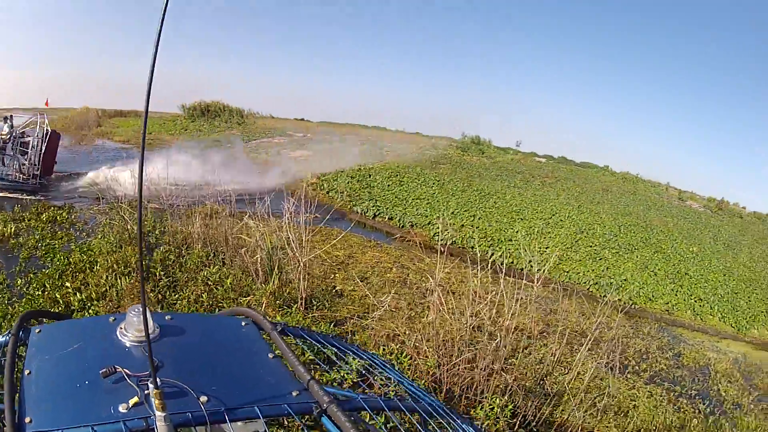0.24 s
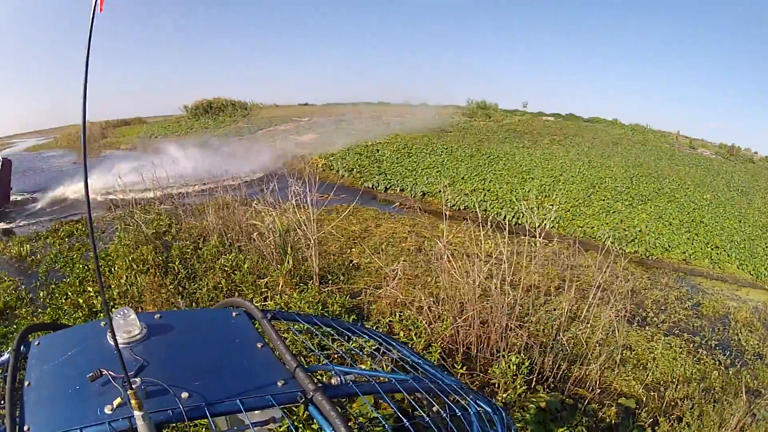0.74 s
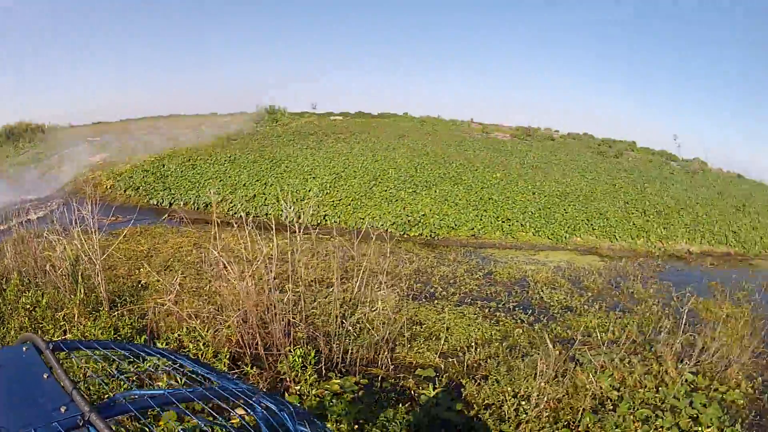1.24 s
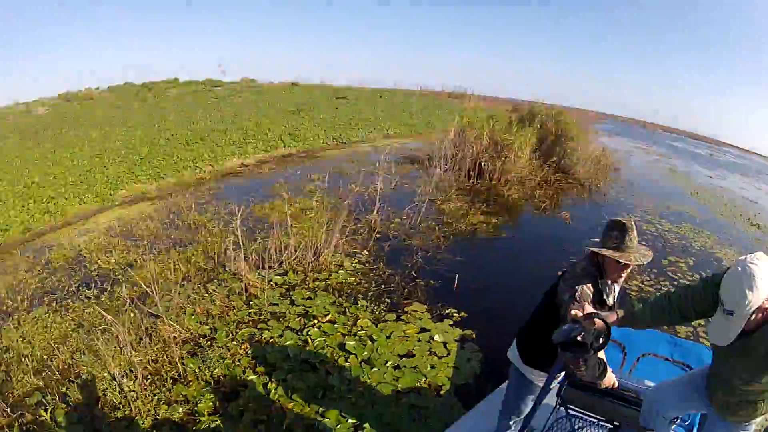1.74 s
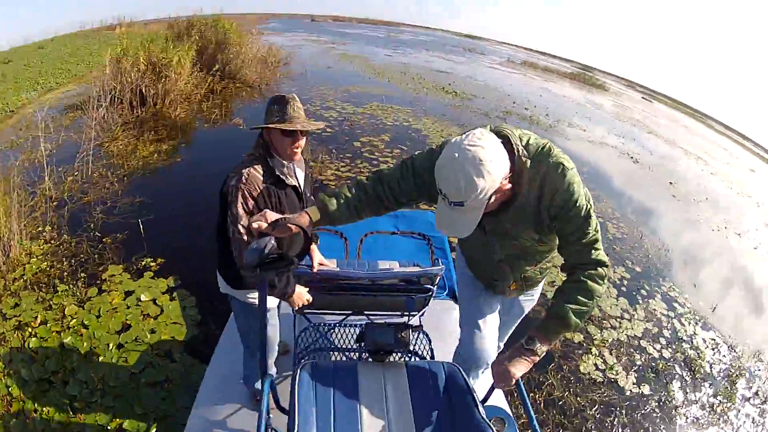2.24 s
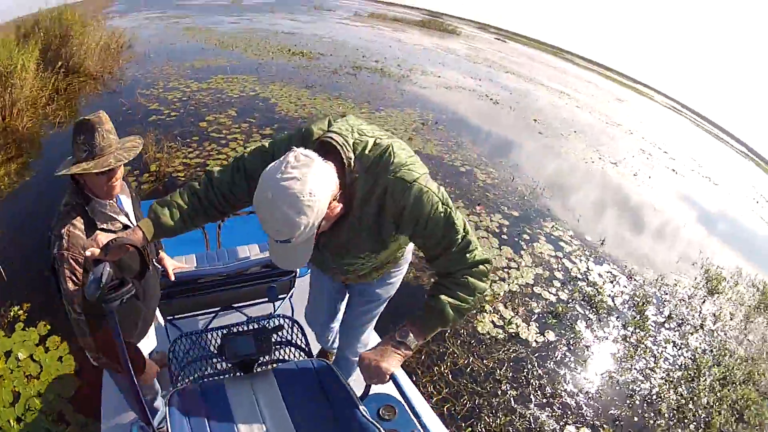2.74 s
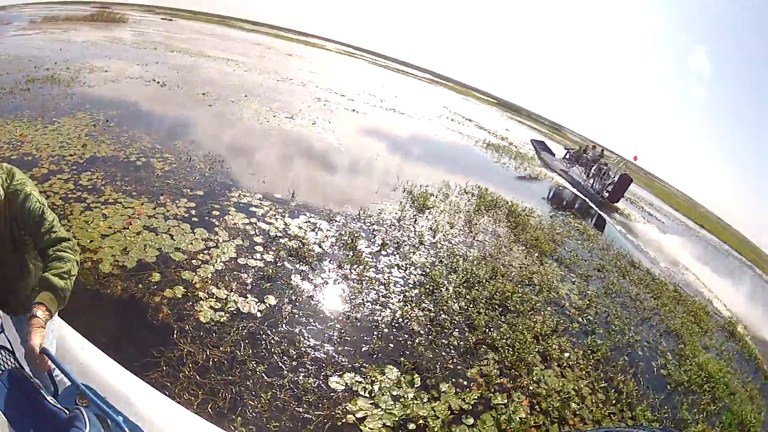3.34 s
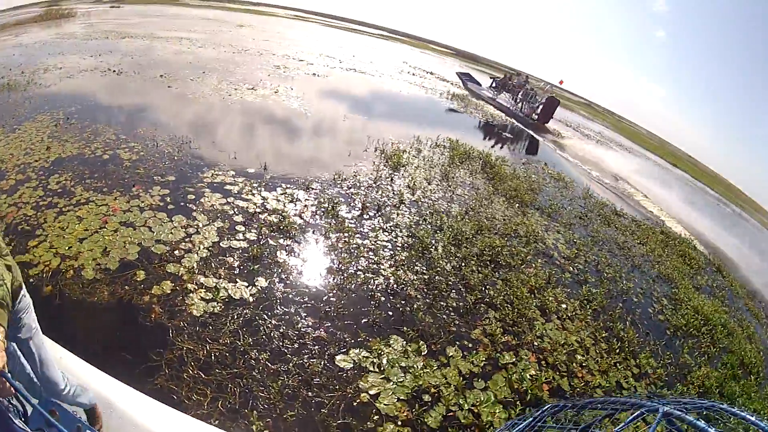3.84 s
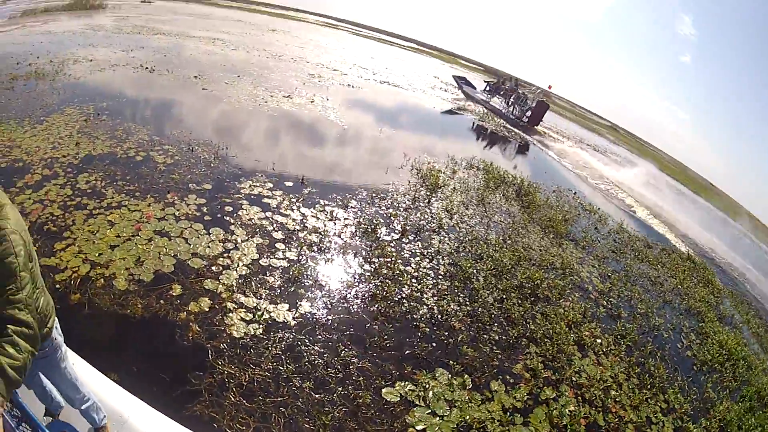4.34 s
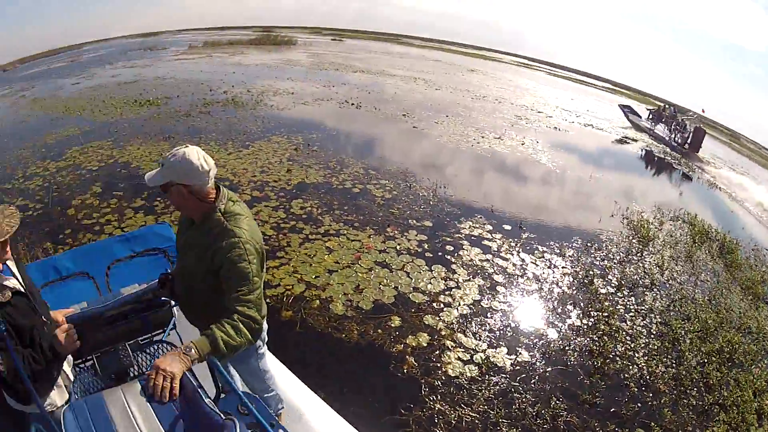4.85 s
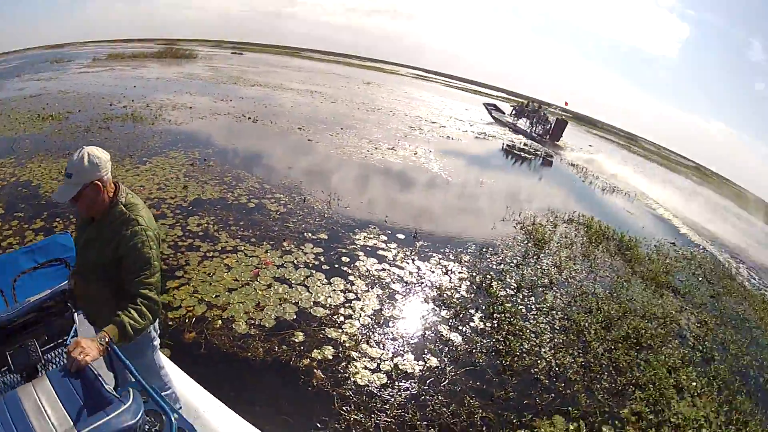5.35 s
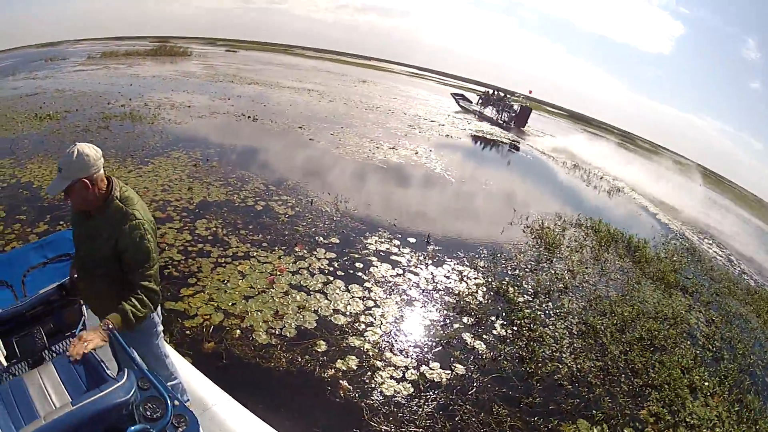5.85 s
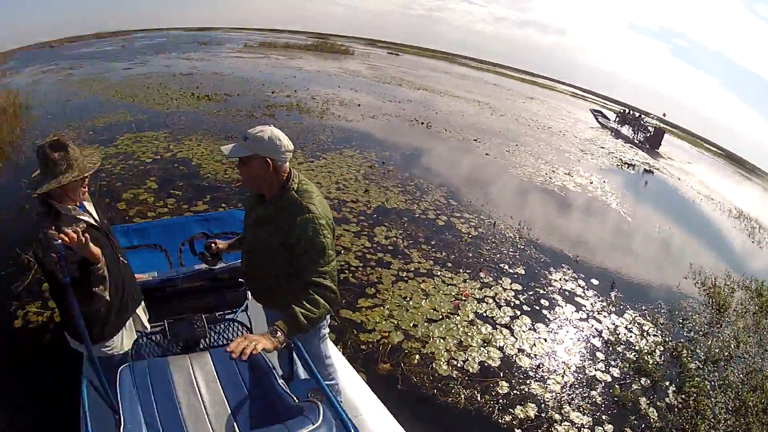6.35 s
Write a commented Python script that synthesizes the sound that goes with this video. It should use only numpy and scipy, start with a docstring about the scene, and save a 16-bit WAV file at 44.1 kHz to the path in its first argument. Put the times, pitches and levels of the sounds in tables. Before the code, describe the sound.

A circling airboat drones loudly, its chopping propeller and rough exhaust easing off and picking up again with the throttle.

```python
"""An airboat circles over a marsh, heard through the microphone of a small head-worn camera.
It starts fast, off to the left: a V8 with open pipes drives a geared three-blade propeller, which
thumps and chops the air into a rasping wash. By 1 s the throttle eases and the boat passes behind;
it opens up by 1.8 s, coming round on the right. In front from 3.2 s, it eases again, then picks up
further off by 5.5 s. Each turn of the head makes the camera's housing colour the sound anew,
and throughout its slow sampling mirrors the wash into the treble."""
import sys
import numpy as np
from scipy import signal
from scipy.fft import rfft, irfft, next_fast_len
from scipy.io import wavfile
from scipy.ndimage import uniform_filter1d

SR = 44100
rng = np.random.default_rng(int(sys.argv[2]) if len(sys.argv) > 2 else 0)


def master(y):
    """Save y as 16-bit WAV."""
    cut = np.clip(np.atleast_2d(y).T, -1, 1)
    pcm = np.round(cut * 32767)  # scale
    wavfile.write(sys.argv[1], SR, pcm.astype(np.int16))


N = 290619

# Air wash at the microphone, one spectrum per heading: (frequency [Hz], relative density [dB])
WASH_SPECTRA = [
    [(520, -27), (880, -15.5), (969, -12), (1080, -20), (1180, -14), (1350, -19.5), (1510, -13),
     (1860, -7.5), (2270, -7), (2560, 0.5), (2910, -11), (3130, -7), (4210, -18), (4950, -14.5),
     (6000, -26), (7800, -62), (13200, -120)],
    [(520, -40), (880, -18), (923, -7), (1000, -7), (1520, -4.5), (1650, -6), (1810, -5.5), (2290, -2),
     (2480, -6.5), (2840, 1.5), (3110, -12), (4080, -9.5), (4990, -16), (5490, -12), (6000, -28),
     (7800, -60), (13200, -120)],
    [(520, -27), (880, 0.5), (1050, -8.5), (1450, -2), (1760, 0), (2230, 0), (2440, -6), (2710, 6),
     (2870, -5.5), (3160, -4.5), (3450, -19), (3680, -6), (4020, -17.5), (4910, -12), (6000, -26),
     (7800, -68), (13200, -120)],
    [(520, -25), (880, -9), (993, -4), (1190, -12), (1580, -1), (1950, -1.5), (2270, 3), (2750, -6.5),
     (2870, -7.5), (2940, -19), (3710, -11), (4210, -26.5), (4680, -12), (5150, -22), (6000, -27),
     (7800, -61), (13200, -120)],
    [(520, -47), (880, -24), (993, -18.5), (1180, -26), (1440, -23), (1580, -15), (1830, -19), (2250, -14),
     (2670, 1), (3030, -11.5), (3370, -19), (4250, -25), (4490, -33), (5150, -21.5), (6000, -37),
     (7800, -71), (13200, -120)],
    [(520, -40), (880, -13), (1230, -10.5), (1630, -7.5), (1780, -12.5), (2360, -1.5), (2520, 2.5),
     (2780, -2), (3080, -9), (3310, -19), (3710, -11), (4050, -21.5), (4910, -15.5), (5410, -31),
     (6000, -32), (7800, -71), (13200, -120)],
    [(520, -48), (880, -20), (1180, -14.5), (1370, -24), (1580, -16), (1760, -19.5), (2010, -13.5),
     (2290, -12), (2520, -2), (2670, 3), (3310, -18), (4250, -23.5), (4570, -34), (5150, -18.5),
     (6000, -38.5), (7800, -71), (13200, -120)],
]
# Resonances and hollows of the housing, alike at every heading: (centre [Hz], width [Hz], gain [dB])
HOUSING_RESONANCES = [(994, 31, -4), (1397, 22, -10), (1598, 33, 4.5), (2135, 51, 3.5), (2170, 66, -1),
                      (2730, 40, -1), (3034, 140, 4), (3690, 42, 6.5), (4126, 100, 5.5), (4480, 160, -2),
                      (4730, 150, 2.5), (5530, 91, -5.5), (5650, 120, 3)]
# The wash swells and sinks as the boat curves: (time [s], level [dB])
WASH_SWELL = [(0, 1), (.15, 3), (.4, 0), (.65, 0.2), (1.05, -0.3), (1.4, 0), (1.63, -4), (1.77, -0.5),
              (2.1, -0.6), (2.4, 1.2), (2.95, 0.2), (3.13, 2.5), (3.3, -0.9), (4.1, 0.4), (4.8, -.5),
              (5.6, 0.6), (6.35, 0.9), (6.59, -3.5)]

def air_wash(blade_angle, level_db):
    """Vortices shed by the tips: a rasp that puffs once per blade over a steadier hiss of spray."""
    swell_db, = curves(WASH_SWELL)
    gain = amp(level_db + swell_db + 0.32 * wobble(8.8))
    puff_sizes = amp(1.9 * rng.standard_normal(int(blade_angle[-1] / np.pi) + 4))
    puff_angle = blade_angle - .8
    blade_index = (puff_angle / (2 * np.pi) + .5).astype(int)
    puffs = puff_sizes[blade_index] * np.exp(2.0 * (np.cos(puff_angle) - 1))
    rasp = unit((1 + 0.84 * puffs) * patchy_noise(depth_db=1.4))
    hiss = unit((1 + 0.12 * puffs) * patchy_noise(depth_db=2.0))
    rasp_share = lambda hz: np.exp(-.5 * (np.log((hz + 1) / 2500) / 0.35) ** 2)  # the middle band
    air = filtered(rasp, lambda hz: np.sqrt(rasp_share(hz)))
    air += filtered(hiss, lambda hz: np.sqrt(1 - rasp_share(hz)))
    cavity = lambda hz: amp(sum(db * peak(hz, centre, width) for centre, width, db in HOUSING_RESONANCES))
    per_heading = filtered(air, lambda hz: cavity(hz) * np.array([gain_at(s, hz) for s in WASH_SPECTRA]))
    return gain * at_heading(unit(per_heading))


# Partials of the thump: (multiple of the blade rate, level when slow [dB], level when fast [dB])
BLADE_PARTIALS = [(1, 0.0, 0.0), (2, -3.0, -2.0), (3, -15.4, -12.1), (4, -13.9, -12.0), (5, -15.7, -17.0),
                  (6, -16.2, -17.0), (7, -15.5, -17.2), (8, -14.8, -14.6), (9, -13.6, -21.4),
                  (10, -19.0, -21.8), (11, -16.6, -24.6)]

def propeller(blade_angle, fast, level_db, slap_db):
    """Each passing blade gives one thump, sharper when it slaps; the upper partials waver in the air."""
    lag_rad = .7
    thumps = np.zeros(N)
    for k, slow_db, fast_db in BLADE_PARTIALS:
        partial_db = slow_db + fast * (fast_db - slow_db) + slap_db * np.log2(k)
        waver_db = .2 * (k - 1) * wobble(8)
        waver_rad = .08 * (k - 1) * wobble(7.3)
        thumps += amp(partial_db + waver_db) * np.cos(k * (blade_angle - lag_rad) + lag_rad + waver_rad)
    return amp(level_db) * np.sqrt(2) * thumps


# The open pipes favour other orders as the speed changes:
# (multiple of the four-stroke cycle rate, level when slow [dB], level when fast [dB])
EXHAUST_ORDERS = [(2, -20.0, -24.8), (3, -5.2, -2.6), (4, -13.2, -23.9), (5, -7.0, -6.0), (6, -12.9, -27.3),
                  (7, -14.4, -8.2), (8, -4.8, -6.7), (9, -21.2, -15.4), (10, -20.0, -19.0),
                  (11, -12.9, -10.0), (12, -15.5, -20.7), (13, -6.1, -23.1), (14, -25.3, -28.3),
                  (15, -18.0, -18.0), (16, -7.1, -18.2), (17, -21.3, -13.1), (18, -13.5, -12.3),
                  (19, -9.5, -13.3), (20, -18.0, -18.0), (21, -5.5, -21.0), (22, -13.5, -25.0),
                  (23, -19.1, -22.3), (24, -15.2, -20.5), (25, -22.1, -20.1), (26, -22.8, -17.8),
                  (27, -26.8, -21.5), (28, -22.6, -24.1), (29, -15.8, -27.3), (30, -20.1, -30.3),
                  (31, -15.8, -31.7), (32, -24.3, -28.1)]

def exhaust(blade_angle, fast, level_db, blades_per_cycle=2.52):
    """Uneven firing of the V8's two banks sounds both odd and even multiples of the cycle rate."""
    cycle_angle = blade_angle / blades_per_cycle + .59
    pulses = np.zeros(N)
    for k, slow_db, fast_db in EXHAUST_ORDERS:
        order_db = slow_db + fast * (fast_db - slow_db) + .09 * k * wobble(14)
        smear_rad = .4 * k * (k - 5)  # pipes of unequal length spread the pulses
        waver_rad = .025 * k * wobble(14)
        pulses += amp(order_db) * np.cos(k * cycle_angle + smear_rad + waver_rad)
    return amp(level_db) * np.sqrt(2) * pulses


# Rumble between the tones: (frequency [Hz], relative density [dB])
RUMBLE_SPECTRUM = [(15, -50), (25, -14), (60, -11.5), (130, -6), (300, -11.5), (450, -13.5), (700, -15.5),
                   (900, -18), (1200, -29), (2400, -120)]

def rumble(level_db):
    """Broad low turbulence behind the propeller."""
    turbulence = filtered(patchy_noise(depth_db=2.0), lambda hz: gain_at(RUMBLE_SPECTRUM, hz))
    return amp(level_db) * unit(turbulence)


# A faint hum in the background: (centre [Hz], width [Hz], relative level [dB])
HUM_BANDS = [(59.3, 4.3, 1), (119.5, 4.8, -3)]

def hum():
    """Narrow bands of noise that do not follow the throttle."""
    bands = lambda hz: sum(amp(db) * peak(hz, centre, width) for centre, width, db in HUM_BANDS)
    return amp(-52.5) * unit(filtered(rng.standard_normal(N), bands))


# The throttle lever: (time [s], blade rate it asks for [Hz])
THROTTLE_LEVER = [(0.0, 94.88), (0.559, 96.51), (0.918, 74.97), (1.513, 74.79), (1.815, 93.37),
                  (3.03, 94.55), (3.49, 91.09), (3.747, 79.84), (4.787, 80.28), (5.503, 93.28),
                  (6.59, 93.8)]

def throttle(lag_s=.28):
    """The lever's rate and the blade rate, in Hz: the heavy propeller lags behind the lever."""
    lever_hz, = curves(THROTTLE_LEVER)
    inertia = np.exp(-1 / (lag_s * SR))
    blade_hz = lever_hz[0] + signal.lfilter([1 - inertia], [1, -inertia], lever_hz - lever_hz[0])
    return lever_hz, blade_hz


# The housing's effect on the low sounds, one curve per heading: (frequency [Hz], gain [dB])
HOUSING_CURVES = [
    [(120, -0.5), (200, -2.5), (280, 3), (400, -2.5), (520, 2), (600, -4.5), (680, -2), (780, -11.5),
     (950, -4), (1200, -4)],
    [(120, 0), (200, -4.5), (280, 2.5), (400, 0), (520, -3), (600, -3), (680, -5), (780, -1), (950, 5.5),
     (1200, 6)],
    [(120, 0), (200, -5.5), (280, -0.5), (400, -5), (520, -1), (600, -3), (680, -1.5), (780, 1.5),
     (950, -1), (1200, -7)],
    [(120, 0), (200, -4.5), (280, 0), (400, -1), (520, -1), (600, 1), (680, 3.5), (780, 4), (950, 5.5),
     (1200, -1)],
    [(120, 0.5), (200, -3), (280, 1.5), (400, 0.5), (520, 0), (600, 2), (680, 8), (780, -1), (950, 2.5),
     (1200, 0)],
    [(120, -0.5), (200, -0.5), (280, -1), (400, -2), (520, 1), (600, -1), (680, 6.5), (780, 3.5),
     (950, 2.5), (1200, 4)],
    [(120, 0), (200, -3), (280, -0.5), (400, -3), (520, 1), (600, 0), (680, 3), (780, -7), (950, 0.5),
     (1200, -3)],
]

def housing(low):
    """The housing round the microphone colours the low sounds anew as it turns."""
    return at_heading(filtered(low, lambda hz: np.array([gain_at(s, hz) for s in HOUSING_CURVES])))


# Where the boat lies from the microphone: (time [s], heading [index])
# 0 left, 1 behind, 2 and 3 round on the right, 4 in front, 5 edge of view, 6 in front and further off
BOAT_HEADING = [(0, 0), (1.0, 0), (1.3, 1), (1.68, 1), (1.83, 2), (2.35, 2), (2.8, 3), (3.0, 3), (3.2, 4),
                (4.8, 4), (5.0, 5), (5.28, 5), (5.38, 6), (6.36, 6), (6.55, 5), (6.59, 5)]

def at_heading(versions):
    """Cross-fade between the versions heard at each heading."""
    heading, = curves(BOAT_HEADING)
    return sum(np.clip(1 - abs(heading - k), 0, 1) * version for k, version in enumerate(versions))


def amp(db):
    """Decibels to gain."""
    return np.exp(np.asarray(db) * np.log(10) / 20)


def unit(x):
    """Scaled to rms 1."""
    return x / np.sqrt(np.mean(x ** 2, axis=-1, keepdims=True) + 1e-20)


def peak(hz, centre, width):
    """A resonance curve of height 1."""
    return 1 / (1 + (2 * (hz - centre) / width) ** 2)


def gain_at(points, hz):
    """Gain between (frequency [Hz], level [dB]) points on a log axis."""
    point_hz, db = np.transpose(points)
    return amp(np.interp(np.log(hz + 1), np.log(point_hz + 1), db))


def curves(rows):
    """One value per sample for each column after the time."""
    times, *columns = np.transpose(rows)
    return [np.interp(np.arange(N) / SR, times, column) for column in columns]


def wobble(rate):
    """A random curve, rate knots a second."""
    knots = rng.standard_normal(int(N * rate / SR) + 4)
    return np.interp(np.arange(N) * rate / SR, np.arange(len(knots)), knots)


def filtered(x, response):
    """x shaped by a gain that depends on frequency."""
    size = next_fast_len(N + 8192)
    return irfft(rfft(x, size) * response(np.fft.rfftfreq(size, 1 / SR)), size)[..., :N]


def patchy_noise(depth_db):
    """White noise with small patches of random gain in time and frequency."""
    spectra = signal.stft(rng.standard_normal(N), nperseg=512)[2]
    patches = uniform_filter1d(rng.standard_normal(spectra.shape), size=2, axis=0)
    patches = uniform_filter1d(patches, size=5, axis=1)
    return signal.istft(spectra * amp(depth_db * patches / patches.std()), nperseg=512)[1][:N]


# Balance at FAST_HZ before housing and swell, one row per heading:
# (blades [dB], exhaust [dB], rumble [dB], wash [dB], blade slap [dB per octave])
BALANCE = [(-28.5, -27, -32.5, -21.5, 3), (-25, -29, -34, -24, -4), (-25.5, -26, -33.5, -24.5, -0.2),
           (-25.5, -27, -36, -23, 0), (-26, -27, -35, -21, 0.4), (-27.5, -27.5, -33, -21.5, .3),
           (-27, -28, -33.5, -22.5, 1)]
# How those five grow: (with blade rate [dB/Hz], with the lever's lead over the propeller [dB/Hz])
THROTTLE_LAWS = (0.61, .02), (0.44, 0.32), (0.11, 0.025), (0.34, 0.052), (0.046, 0.28)
SLOW_HZ, FAST_HZ = 80, 94  # blade rates of the slow and fast timbres

def scene():
    """The circling boat at one turning microphone, over a faint hum."""
    lever_hz, blade_hz = throttle()
    blade_db, exhaust_db, rumble_db, wash_db, slap_db = (
        at_heading(full_db) + per_speed * (blade_hz - FAST_HZ) + per_load * (lever_hz - blade_hz)
        for full_db, (per_speed, per_load) in zip(np.transpose(BALANCE), THROTTLE_LAWS))
    blade_angle = 2 * np.pi * np.cumsum(blade_hz) / SR  # 2 pi per passing blade
    fast = np.clip((blade_hz - SLOW_HZ) / (FAST_HZ - SLOW_HZ), 0, 1)
    thumps = propeller(blade_angle, fast, blade_db, slap_db)
    pipes = exhaust(blade_angle, fast, exhaust_db)
    low = housing(thumps + pipes + rumble(rumble_db))
    return (low + air_wash(blade_angle, wash_db) + hum())[None]


def record(dry):
    """The camera's slow sampling mirrors the band around the hold rate; holding weakens the mirrors."""
    hold_hz, clock_hz, top_hz = 12000, 48000, 15280
    mirrored = dry * (1 + 2 * np.cos(2 * np.pi * hold_hz * np.arange(N) / SR))
    return filtered(mirrored, lambda hz: np.sinc(hz / hold_hz) / np.sinc(hz / clock_hz) * (hz < top_hz))


dry = scene()
out = record(dry)
master(out)
```